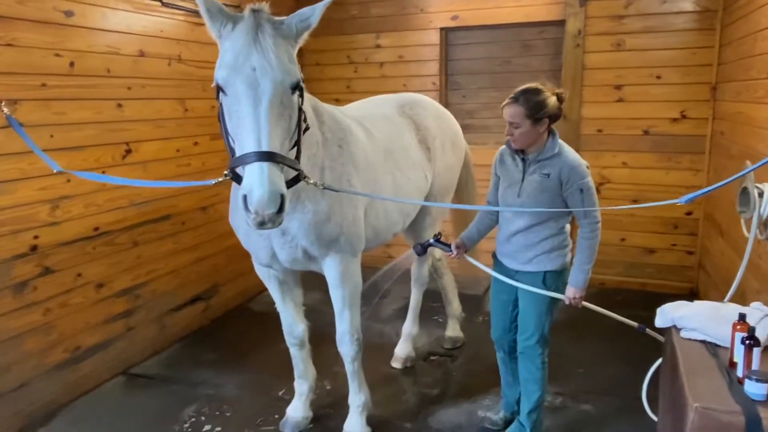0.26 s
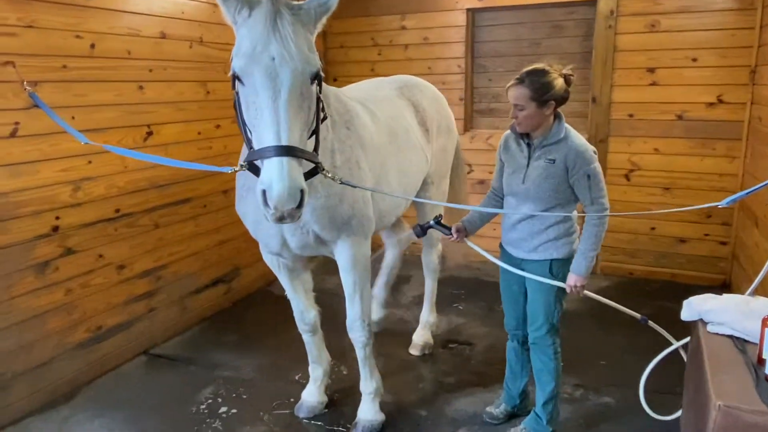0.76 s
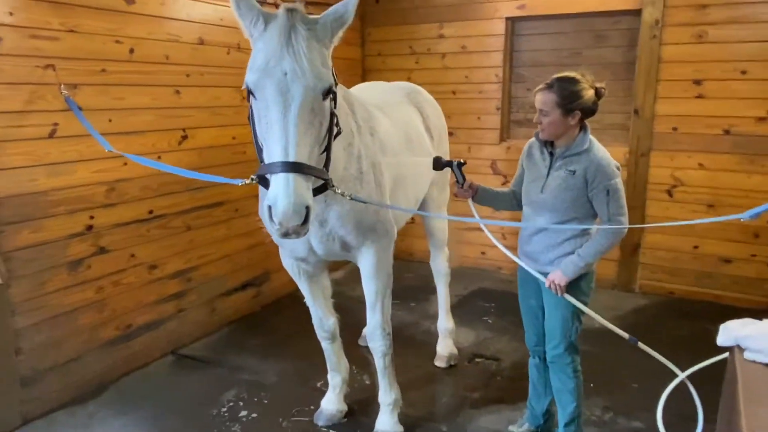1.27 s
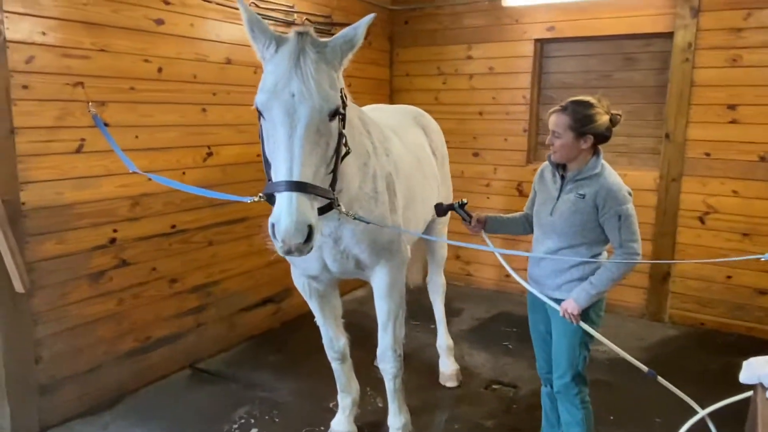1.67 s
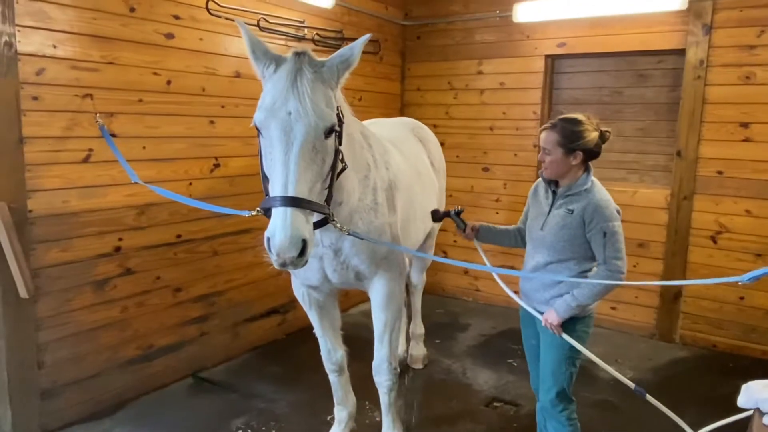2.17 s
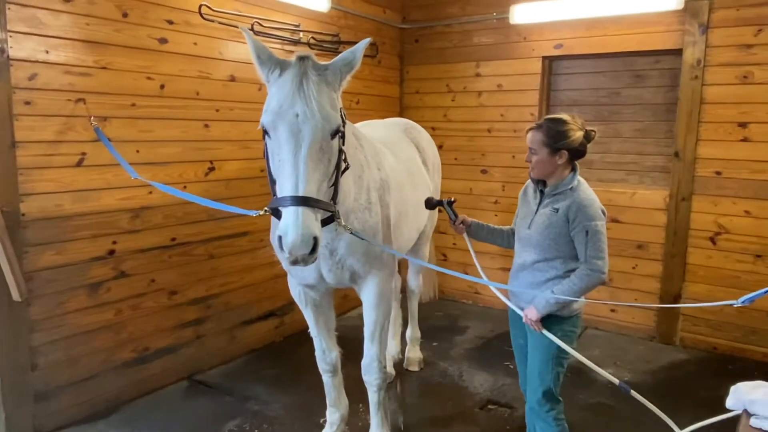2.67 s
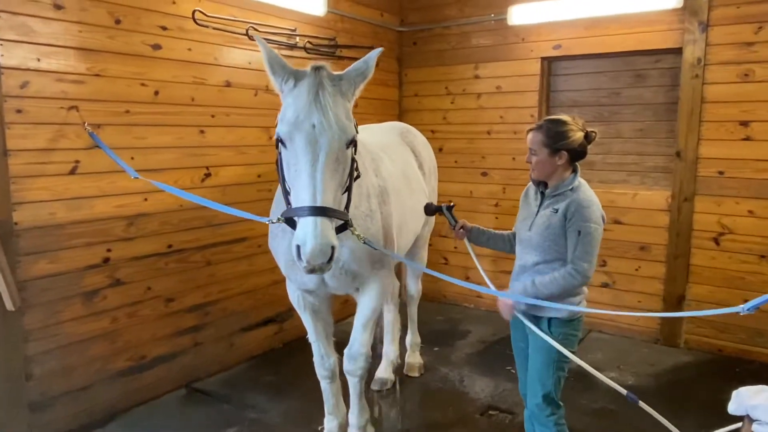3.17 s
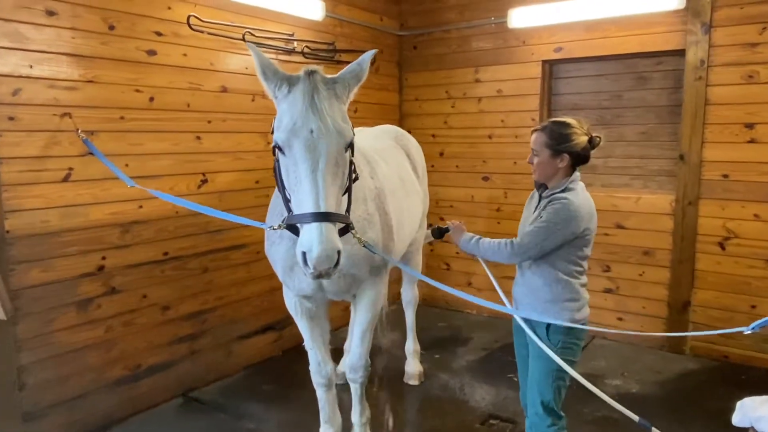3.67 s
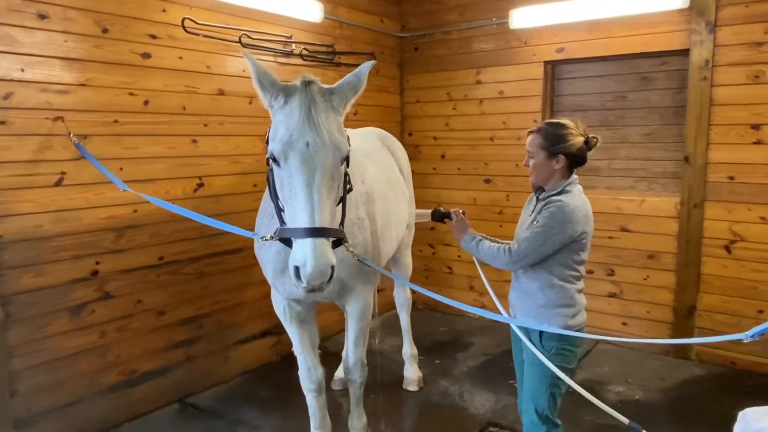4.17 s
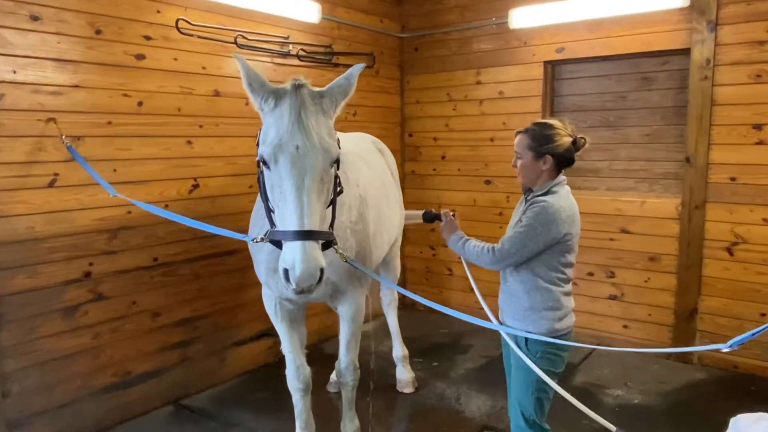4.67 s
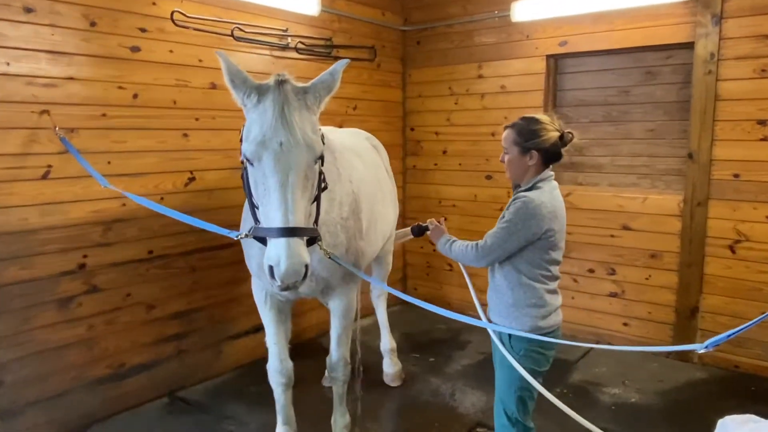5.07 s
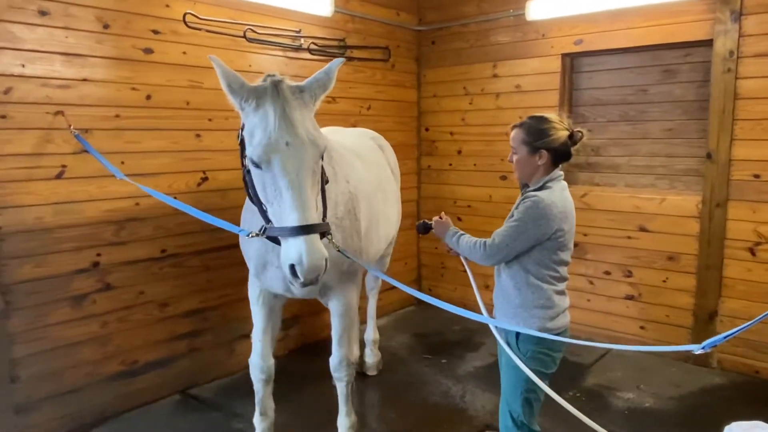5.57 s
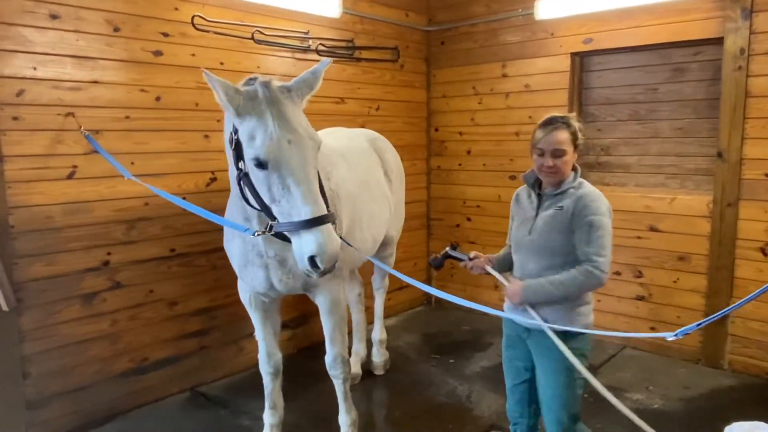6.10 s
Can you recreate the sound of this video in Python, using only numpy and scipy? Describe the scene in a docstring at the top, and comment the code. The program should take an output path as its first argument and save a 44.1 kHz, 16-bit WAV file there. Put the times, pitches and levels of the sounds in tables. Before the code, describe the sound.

A small boarded wash stall with short echoes and soft low rumble, heard in stereo from fairly near. From 0 to 1.3 s the hose spray is weak, a thin hiss with a slight splatter swell around 0.6 s, a tiny hollow gulp at 0.5 s and a dull knock at about 0.87 s. Around 1.4 s the jet strengthens on the horse's coat; by 2.1 s it is a bright, uneven hiss with splatter and light drumming. From 2 to 5.5 s run-off smacks the wet floor in irregular clusters of sharp, bubbly plops and ticks, prominent near 2.4, 3.25, 3.45, 3.7 and 4.05 s. The spray briefly thins around 4.4 s and swells again about 5 s. Small knocks come near 3.5, 3.83 and 4.93 s. After 5.5 s the spray drops sharply to a faint hiss, with a distinct drop at 5.97 s and soft bumps and clunks from 5.8 to 6.3 s.

```python
"""A hose nozzle sprays a horse's legs and coat in a boarded wash stall: droplet impacts, filtered into bands,
give hiss, splatter and drumming, and the same bands carry the barn rumble and the murmur of water.
Run-off smacks the wet rubber floor as ringing bubbles with a crack and a tick. Thumps and knocks, some perhaps
hooves or boots, some short thumps at the microphone, are filtered noise with damped low modes; tones gulp.
Walls add echoes and a tail. Two microphone ports hear it, alike in the bass, with a phase lag in the treble."""
import sys
import numpy as np
from scipy import signal
from scipy.fft import rfft, irfft, next_fast_len
from scipy.io import wavfile

SR = 44100
rng = np.random.default_rng(int(sys.argv[2]) if len(sys.argv) > 2 else 0)


def store_wav(level_fs):
    """Save 16-bit WAV to argv[1]."""
    pcm = np.round(np.clip(np.atleast_2d(level_fs), -1, 1) * 32767)
    wavfile.write(sys.argv[1], SR, pcm.T.astype(np.int16))


N = 279594   # length in samples

# sweeping jet: t/s, splatter level/dB, mist level/dB, low drumming level/dB
JET_LEVELS = [(0.0, -57, -58.5, -94), (0.32, -55.5, -54.5, -55), (0.6, -45, -51, -49),
              (0.83, -54, -55.5, -53), (1.13, -63, -53.5, -61), (1.27, -59, -47, -53),
              (1.38, -45, -47.5, -53), (1.58, -39.5, -42, -41.5), (1.98, -47, -48.5, -45.5),
              (2.14, -35, -38, -37.5), (2.24, -42.5, -41, -42), (2.5, -40, -59, -44), (2.63, -41, -45, -39),
              (2.77, -43.5, -41.5, -38), (2.88, -59, -34.5, -39), (2.97, -56, -44.5, -42.5),
              (3.06, -46.5, -40, -43.5), (3.32, -40, -38, -40.5), (3.73, -43, -42.5, -42),
              (3.92, -40.5, -41.5, -40), (4.18, -46.5, -44, -46.5), (4.41, -49.5, -45.5, -50),
              (4.64, -43, -49.5, -47.5), (4.96, -39.5, -43, -44.5), (5.12, -42.5, -37.5, -44),
              (5.33, -45, -38.5, -44), (5.61, -64, -59.5, -56), (5.8, -66, -57.5, -69),
              (6.02, -63, -48.5, -55), (6.09, -59, -43.5, -48), (6.2, -55, -63, -55.5),
              (6.34, -62.5, -56, -56)]
# spectra of the jet's parts: f/Hz, level per Hz/dB
DRUMMING_SPECTRUM = [(300, -13.5), (600, -13), (850, -6), (1100, -1.5), (1400, -3), (2200, -10)]
SPLATTER_SPECTRUM = [(900, -31), (1300, -7), (1600, -3.5), (2000, 0), (2600, -3), (3100, -9), (3700, -6),
                     (5500, -22)]
MIST_SPECTRUM = [(2200, -9), (3500, -6), (4500, -2), (5500, -9.5), (7000, -5.5), (10000, -34)]
NOZZLE_SPECTRUM = [(5000, 2), (8000, -3.5), (10000, 1.5), (12500, -1.5), (15000, -12.5), (17000, 13)]
# hiss at the nozzle: t/s, level/dB
NOZZLE_LEVEL = [(0.0, -53), (0.14, -64.5), (0.55, -51), (0.97, -60.5), (1.45, -44.5), (1.94, -51),
                (2.03, -43), (2.21, -46), (3.16, -43), (3.21, -42.5), (3.67, -42), (3.69, -40), (3.73, -43),
                (4.33, -53.5), (4.34, -47), (4.7, -48.5), (5.17, -40), (5.77, -61.5), (6.11, -60),
                (6.34, -69)]
# barn rumble: t/s, level/dB
RUMBLE_LEVEL = [(0.0, -52.5), (0.44, -49.5), (3.37, -54.5), (3.81, -47), (4.45, -53), (5.4, -46),
                (5.72, -53), (6.34, -50.5)]
# barn rumble: f/Hz, level per Hz/dB
RUMBLE_SPECTRUM = [(15, -37), (25, -21), (48, -2), (70, 0), (120, -4.5), (160, -9), (230, -23), (300, -42)]
# murmur of water on the floor: t/s, level/dB
MURMUR_LEVEL = [(0.0, -58.5), (0.63, -54), (0.94, -56), (1.36, -60), (1.77, -56), (2.59, -60), (2.77, -52),
                (3.02, -59.5), (3.28, -60.5), (3.78, -54), (4.5, -56.5), (5.19, -54.5), (5.4, -55),
                (5.63, -56.5), (5.81, -66.5), (6.34, -56)]
# murmur of water: f/Hz, level per Hz/dB
MURMUR_SPECTRUM = [(150, -16), (200, 6), (260, -1.5), (420, -1.5), (600, -4.5), (800, -4.5), (1040, -30)]
# jet's core against the splatter: t/s, relative level/dB
CORE_LEVEL = [(0, -20), (1.4, -10), (1.7, -11), (2.0, -10), (2.6, -12), (3.4, -15), (4.2, -8), (4.7, -8),
              (5.0, -17), (5.5, -5), (6.34, -14)]
# run-off dripping from the coat: t/s, mean rate of small drops/(1/s)
RUN_OFF_RATE = [(0, 4.7), (1.7, 13.7), (2.0, 113), (3.0, 51), (4.2, 64), (5.4, 74), (5.8, 25), (6.34, 7.6)]
# loud drops on the wet floor: t/s, level/dB, bubble f/Hz, crack and tick each re bubble/dB, ring decay/cycles
LOUD_DROPS = [(0.8862, -31, 7600, -3, 10, 1.6), (1.8713, -29.5, 4370, -9, -18.0, 1.6),
              (1.9196, -27, 4530, 2, -11.0, 3.5), (1.9992, -29, 7080.0, 2, -3, 3.5),
              (2.006, -24, 7040, 3, 8, 3.3), (2.027, -28, 3300, 2, -24, 1.3),
              (2.0294, -14.5, 2830, 2, 3, 0.49), (2.0434, -15.5, 2660, -12, -6, 0.4),
              (2.0527, -28, 3000.0, -5.0, -20.0, 1.2), (2.058, -18, 7500, -15, -10, 1.5),
              (2.0762, -22, 2620, -4, 11, 0.76), (2.1065, -15, 3940, -3, -28, 1.4),
              (2.109, -15, 2400, 2, -3, 2.8), (2.126, -14, 4620, -8, -14, 1),
              (2.2522, -11, 3200, -7, -18, 0.47), (2.386, -20.5, 4500, -13, -25.0, 1.5),
              (2.408, -9.5, 2600, -6, -31, 0.91), (2.4612, -17.5, 2750, -8, -30.0, 1.7),
              (2.466, -24, 2540, -12, -25.0, 1.8), (2.694, -28.5, 2660.0, 8, -20.0, 0.71),
              (2.7166, -25.5, 3800, 1, 6, 1.4), (2.7943, -15.5, 3700, 1, 0, 0.9),
              (2.8, -30, 3880.0, -1.0, -12.0, 3.1), (2.8073, -20, 7500, -11, -9.0, 3.5),
              (2.856, -30, 4150.0, -7, -13.0, 1.3), (2.8662, -16, 5030, -14, 2, 0.38),
              (3.1007, -20.5, 5300, -14, -17, 3), (3.1384, -23.5, 2710, -4, -30.0, 1.6),
              (3.187, -22.5, 6600, -3, -17, 3.1), (3.2076, -13.5, 2690.0, -25.0, -35, 0.97),
              (3.216, -13, 4400, -8, -7, 0.8), (3.2377, -12.5, 6700, -9, 7, 0.99),
              (3.248, -10, 2480, -3.5, -20.0, 0.75), (3.2575, -16.5, 6200, 3, -9.0, 2),
              (3.395, -14, 2440, -20, -20.0, 2.8), (3.414, -10, 4140, -13, -13, 1.1),
              (3.417, -27.5, 2330, 10, -11, 1.5), (3.42, -19, 4380, 1, -18, 4.2),
              (3.436, -19.5, 3080, -27, 11.5, 2.9), (3.4508, -9.5, 2690, -16, -22, 2.3),
              (3.6209, -22.5, 2780, -20, 3, 3), (3.6839, -14.5, 3930, -19, 11.5, 0.89),
              (3.688, -35, 4500, 4, -2, 1.8), (3.6947, -20, 4000.0, -10, -6.0, 1.0),
              (3.6976, -7.5, 2290, -1.5, -8, 1.9), (3.7348, -9.5, 2630.0, -29, -21.0, 3.1),
              (3.7425, -16, 3070, -23, -25.0, 4.7), (3.825, -25, 3430, -16, 11, 3.3),
              (3.8414, -19, 2050, -2, -22, 0.63), (3.9364, -22.5, 2470, -2, 5, 4.1),
              (3.945, -10, 2630.0, -10.5, -24.0, 1.5), (3.963, -17.5, 3670, -7, 1, 1.5),
              (4.0125, -25, 4320.0, -8, -17.0, 1.4), (4.0543, -6.5, 2670, -2, -8, 0.95),
              (4.073, -25, 2590, -11.0, -16.0, 2.3), (4.3459, -26, 4200, -12, 9, 1.7),
              (4.381, -24, 6300, -3, 5, 1.1), (4.4269, -20.5, 3550, -3, -4, 1),
              (4.5948, -16, 6400, -12, 2, 0.73), (4.7002, -15.5, 4730, -3, -12, 0.7),
              (4.8064, -22.5, 2450.0, -1, -16, 1.2), (4.908, -28, 3810, -8, -20, 1.2),
              (4.914, -16.5, 3620.0, -13, -19.0, 1.6), (4.936, -21, 2170, 2, -26, 0.47),
              (4.9502, -13, 2900, -8, -24, 1.2), (4.9637, -27, 3040, -1, -20, 2),
              (4.977, -16.5, 3640.0, -12, -16.0, 2), (5.0181, -23, 2650, 8.5, -30.0, 3.5),
              (5.042, -28, 7000, -8, 13, 1.5), (5.053, -25, 7800, -3, 17, 1.5),
              (5.0631, -13.5, 2490, -6.5, -18.0, 1.8), (5.127, -22, 3490.0, 1, 9, 2.1),
              (5.1641, -23, 5400, -16, -21, 4.1), (5.238, -34, 3660, 10, -13, 1.7),
              (5.2696, -19.5, 3980, -1.5, -30.0, 0.7), (5.3223, -22.5, 3800, -3, 1, 1.9),
              (5.3772, -18, 7770.0, -7, -5.0, 2.3), (5.3845, -20.5, 3170, 3.5, -10, 0.63),
              (5.3972, -14, 2690, -14, -2, 1), (5.4216, -23.5, 2500, 9.5, -30.0, 1.4),
              (5.501, -19.5, 4260, -6.5, -7, 0.61), (5.553, -45, 7240.0, -29, 0.0, 3.5),
              (5.5627, -33, 5100.0, -7, -5, 3.5), (5.605, -37, 3840, -15, 15, 1.6),
              (5.6406, -35.5, 5840, -3, -15, 4.6), (5.91, -28.5, 4540, 3, -3, 0.33),
              (5.9683, -16.5, 4700, -2.5, -16, 1.6)]
# hollow gulps, as of water sucked from under a sole: t/s, level/dB, start f/Hz, glide/(octaves/s), length/s
SOLE_GULPS = [(0.489, -40, 321.3, -9.5, 0.05), (2.61, -36, 336, -2, 0.027), (2.631, -38, 290.4, 11, 0.06)]
# thumps and knocks, some perhaps hooves or boots, some short thumps at the microphone:
# t/s, knock level/dB, knock f/Hz, boom drive/dB, extra drive above 100 Hz/dB, knock decay/s
THUMPS = [(0.869, -32, 573, -45, -10, 0.02), (0.871, -51, 810, -60, 2, 0.018),
          (0.877, -41.5, 335, -30.5, -0.5, 0.032), (0.905, -50, 660, -57, 3, 0.034),
          (0.94, -45, 730, -63, 0, 0.0099), (0.981, -58, 605, -43, -17, 0.02),
          (1.006, -48.5, 690, -53, 4, 0.018), (1.09, -60, 493, -52, -21, 0.034),
          (2.019, -38, 497, -39.5, 4, 0.012), (3.478, -46, 472, -64, -9, 0.036),
          (3.555, -40.5, 407, -55, 1, 0.029), (3.573, -42.5, 306, -35.5, -25, 0.012),
          (3.646, -50.5, 302, -41, -10, 0.038), (3.834, -30, 1220, -52, 6, 0.0034),
          (3.84, -34, 1220, -65, 0, 0.024), (3.848, -36, 2210, -58, 0, 0.02),
          (3.837, -38.5, 382, -43, -6, 0.028), (4.189, -50, 533, -56, -4, 0.044),
          (4.934, -31, 540, -60, 8, 0.0023), (4.935, -39.5, 258, -60, 8, 0.0035),
          (4.991, -62, 330, -62, 4, 0.0053), (5.145, -55, 249, -43.5, 13.5, 0.021),
          (5.176, -40.5, 315, -43, 9, 0.016), (5.816, -52, 850, -52, 2, 0.034),
          (5.818, -53, 300, -39, 2.5, 0.037), (5.837, -50.5, 840, -47, 1, 0.043),
          (5.873, -47, 290, -51, 11, 0.017), (6.032, -61, 1200, -60, 0, 0.02),
          (6.045, -48.5, 1750, -38, 6, 0.018), (6.062, -39.5, 1130, -48, 3, 0.008),
          (6.066, -45.5, 610, -60, 1, 0.015), (6.076, -45, 251, -36, 9, 0.047),
          (6.104, -47, 780, -39, 8.5, 0.013), (6.169, -50, 292, -59, 4, 0.027),
          (6.219, -53, 392, -55, 13, 0.023), (6.265, -62, 297, -55, 4, .03)]
# low modes of the boom: f/Hz, relative level/dB, t60/s
BOOM_MODES = [(59, -2, 0.12), (68.8, 6, 0.19), (74.4, 3, 0.17), (119.4, -4, 0.097), (123, 3, 0.085),
              (154, -6, 0.12), (247, -13, 0.085)]
# coherence of the two ports: f/Hz, share of power heard by both
SHARED_POWER = [(60, 0.89), (200, 0.72), (400, 0.48), (550, 0.1), (1000, 0.55), (1400, 0.029), (2200, 0.24),
                (3500, 0.23), (6000, 0.023), (8000, 1), (16000, 1)]
# phase between the ports: f/Hz, lead of the left/rad
LEFT_LEAD = [(0, 0), (1600, 0), (3700, 1.5), (4900, .3), (5300, -1), (6200, .2), (7000, 0), (9000, -np.pi),
             (11100, -2 * np.pi), (13300, -3 * np.pi), (15300, -4 * np.pi), (17000, -15)]
# decay of the stall: f/Hz, t60/s
STALL_DECAY = [(100, 0.7), (500, 0.95), (2500, 0.3), (8000, 0.55), (16000, 0.013)]
# early reflections: delay/s, level/dB
EARLY_ECHOES = [(.0065, -12.5), (0.016, -14)]

CORE_HZ, CORE_HALF_WIDTH_HZ, CORE_WAVER_DB = 1970, 175, 3
BUBBLES_PER_S, BUBBLES_DB, BUBBLE_CYCLES = 260, -6.5, 31   # level re drumming; cycles to fall 60 dB
NARROW_HISS_DB, JET_LIFTS_S, LIFT_FADE_S = -59.5, 0.99, 0.37   # while the jet points at the floor
SPLASH_MIST_DB, SPLASH_HISS_DB, SPLASH_DECAY_S = -25.5, -41, 0.041   # levels re the loud drop
DROP_SAMPLES, LEAD = 400, 100   # length of a drop, and its part before the peak
SWELL_CYCLES, CRACK_DECAY_S, TICK_DECAY_S = 1.22, 0.00086, 0.00092
SPATTER_DB = -8.5   # rough tails of crack and tick
CRACK_HZ = (1800, 7500)   # the tick lies above the upper edge
DROP_CUT_HZ = 1510   # a drop is too small to sound lower
GULP_EDGE_S, GULP_WOBBLE_OCT, GULP_FLUTTER_DB = 0.013, .1, 2.5
RISE_SHARE, KNOCK_WIDTH_OCT = 0.19, 1.1   # rise time per decay time; width of the noise
KNOCK_RING_DB, KNOCK_RING_CYCLES = 6, 2.0   # a ring at the first touch
SIDE_WALL_S, SIDE_WALL_DB, SIDE_WALL_HZ = .0119, [[-5.5], [1]], (3200, 7000)   # dB for left, right
CUTOFF_HZ = 15700


def amp(db):
    """Logarithmic level: amplitude grows tenfold every 20 dB."""
    return 10 ** (np.asarray(db) / 20)


def rms_one(x):
    """Normalization of mean power: the signal is scaled to rms 1."""
    return x / np.sqrt(np.mean(x ** 2) + 1e-20)


def filtered(x, order, hz, kind):
    """Linear filtering: a Butterworth response passes the chosen part of the spectrum."""
    return signal.sosfilt(signal.butter(order, hz, kind, fs=SR, output="sos"), x)


def in_time(rows):
    """Linear interpolation: each column of a time table becomes a sampled curve."""
    s, *columns = np.transpose(rows)
    return [np.interp(np.arange(N) / SR, s, c) for c in columns]


def at_hz(points, hz):
    """Interpolation of a spectrum on a logarithmic frequency axis."""
    frequencies, values = np.array(points).T
    return np.interp(np.log(hz), np.log(frequencies), values)


def drift(rate):
    """Low-passed randomness: a curve of spread 1 that changes about rate times a second."""
    r = np.exp(-80 * np.pi * rate / SR)   # computed at every 40th sample
    noise = rng.standard_normal(N // 40 + 2002)
    slow = signal.lfilter([1], [1, -2 * r, r * r], noise)[2000:]   # settled part only
    return np.interp(np.arange(N) / 40, np.arange(len(slow)), rms_one(slow))


def bands(x, low_hz):
    """Third-octave analysis: neighbouring bands take turns on two independent noises."""
    edges = low_hz * 2 ** (np.arange(0, 29) / 3)
    for k, (low, high) in enumerate(zip(edges, edges[1:])):
        yield np.sqrt(low * high), filtered(x[k % 2], 2, [low, high], "band")


def ports(common, own=None):
    """Partial coherence: left and right share a phase-shifted sound, mixed with what each hears alone."""
    size = next_fast_len(N)
    hz = np.arange(size // 2 + 1) * SR / size
    half_turn = np.exp(.5j * np.interp(hz, *np.transpose(LEFT_LEAD)))
    both = rfft(common, size) * np.array([half_turn, half_turn.conj()])
    if own is not None:
        share = np.clip(at_hz(SHARED_POWER, hz + 1), 0, 1)
        both = np.sqrt(share) * both + np.sqrt(1 - share) * rfft(own, size)
    return irfft(both, size)[:, :N]


def droplets(per_s, spread_db, shape):
    """Shot noise: random impacts of uneven size and either sign, scaled to rms 1."""
    sizes = amp(spread_db * np.minimum(rng.exponential(1, shape), 6))
    signed = sizes * rng.choice([-1, 1], shape)
    return rms_one(signed * (rng.random(shape) < per_s / SR))


def spray_and_rumble(patchy_db=0.98, flicker_db=1.61, sputter_db=0.46):
    """Additive power spectra: droplet noise is weighted by band, swelling partly together, partly alone."""
    splatter, mist, drumming = in_time(JET_LEVELS)
    levels = [drumming, splatter, mist]
    levels += in_time(NOZZLE_LEVEL) + in_time(RUMBLE_LEVEL) + in_time(MURMUR_LEVEL)
    spectra = [DRUMMING_SPECTRUM, SPLATTER_SPECTRUM, MIST_SPECTRUM,
               NOZZLE_SPECTRUM, RUMBLE_SPECTRUM, MURMUR_SPECTRUM]
    widths_hz = [700, 1300, 2000, 3000, 100, 300]   # each power is spread over this width
    power = [amp(2 * level) / width * SR / 2 for level, width in zip(levels, widths_hz)]
    splash = splashes() * SR / 2
    power[2] = power[2] + amp(2 * SPLASH_MIST_DB) * splash / widths_hz[2]
    power[3] = power[3] + amp(2 * SPLASH_HISS_DB) * splash / widths_hz[3]
    together = patchy_db * drift(3.1) + flicker_db * drift(10.2) + sputter_db * drift(135)
    out = 0
    for hz, band in bands(droplets(9000, 1.36, (2, 3, N)), 27.28):
        mix = 0
        for p, spectrum in zip(power, spectra):
            if spectrum[0][0] < hz < spectrum[-1][0]:
                mix = mix + p * amp(2 * at_hz(spectrum, hz))
        # the shared swelling is weaker in the bass
        swelling_db = together * np.clip(hz / 3000, .2, 1) + flicker_db * drift(18.8)
        out = out + np.sqrt(mix) * amp(swelling_db) * band
    return ports(out[0], out[1:])


def jet_core():
    """Band-limited shot noise: a focused, wavering band of the splatter where the jet lands hardest."""
    edges = [CORE_HZ - CORE_HALF_WIDTH_HZ, CORE_HZ + CORE_HALF_WIDTH_HZ]
    noise = rms_one(filtered(droplets(4000, 2.5, (3, N)), 2, edges, "band"))
    level_db = in_time(JET_LEVELS)[0] + in_time(CORE_LEVEL)[0] + CORE_WAVER_DB * drift(6.3)
    noise = noise * amp(level_db)
    return ports(noise[0], noise[1:])


def film_bubbles():
    """Damped resonance: bursts in the water film on the coat ring briefly at one of 16 pitches."""
    bursts = droplets(BUBBLES_PER_S, 4.0, (3, N))
    dealt, out = rng.integers(0, 16, (3, N)), 0
    for k, hz in enumerate(np.geomspace(850, 2900, num=16)):
        r, w = amp(-60 * hz / (BUBBLE_CYCLES * SR)), 2 * np.pi * hz / SR
        struck = bursts * (dealt == k) + 1e-18
        out = out + signal.lfilter([0, np.sin(w)], [1, -2 * r * np.cos(w), r * r], struck)
    out = rms_one(out) * amp(in_time(JET_LEVELS)[2] + BUBBLES_DB)   # follows the drumming
    return ports(out[0], out[1:])


def narrow_hiss(hz=1120.0, half_width_hz=80.0, waver_db=2.5):
    """Narrow-band noise: one band wavers and fades out as the jet lifts."""
    edges = [hz - half_width_hz, hz + half_width_hz]
    noise = rms_one(filtered(rng.standard_normal((3, N)), 2, edges, "band"))
    fade = np.clip(1 - (np.arange(N) / SR - JET_LIFTS_S) / LIFT_FADE_S, 0, 1)
    noise = noise * amp(NARROW_HISS_DB + waver_db * drift(9.8)) * fade
    return ports(noise[0], noise[1:])


def drop(hz, crack_db, tick_db, cycles, rise=0.003):
    """Bubble resonance: trapped air swells and rings with rising pitch; a crack and a tick mark its peak."""
    t = (np.arange(DROP_SAMPLES) - LEAD) / SR
    turns = hz * t
    attack = (np.minimum(turns, 0) / SWELL_CYCLES) ** 2
    decay = np.maximum(turns, 0) / max(cycles, .4)
    bubble = np.sin(2 * np.pi * turns * (1 + rise * turns / 2)) * np.exp(-attack - decay)
    slap = t == 0
    spatter = amp(SPATTER_DB) * rng.standard_normal(DROP_SAMPLES) * (t > 0)
    # zero-phase filters keep crack and tick centred on the slap
    crack_band = signal.butter(2, CRACK_HZ, "band", fs=SR, output="sos")
    tick_band = signal.butter(2, CRACK_HZ[1], "high", fs=SR, output="sos")
    crack = signal.sosfiltfilt(crack_band, slap + spatter * np.exp(-np.abs(t) / CRACK_DECAY_S))
    tick = signal.sosfiltfilt(tick_band, slap + spatter * np.exp(-np.abs(t) / TICK_DECAY_S))
    crack = amp(crack_db) * crack / np.abs(crack).max()
    return bubble + crack + amp(tick_db) * tick / np.abs(tick).max()


def drops(small_db=5.0):
    """Random arrivals: small drops fall at the run-off rate, their level following the mist, among loud ones."""
    out = np.zeros(N + DROP_SAMPLES)
    for s, db, hz, crack_db, tick_db, cycles in LOUD_DROPS:
        i = round(s * SR) - LEAD
        out[i:i + DROP_SAMPLES] += amp(db) * drop(hz, crack_db, tick_db, cycles)
    mist_db = in_time(JET_LEVELS)[1]
    fallen = np.cumsum(in_time(RUN_OFF_RATE)[0]) / SR   # expected count so far
    gaps, pitches, sizes = rng.random((600, 3)).T
    starts = np.searchsorted(fallen, np.cumsum(-np.log(gaps)))
    for i, pitch, size in zip(starts, pitches, sizes):
        if i < N:
            level_db = mist_db[i - 1] + small_db - 3.0 * np.log(size + 0.079)
            out[i:i + DROP_SAMPLES] += amp(level_db) * drop(2200 * 3.5 ** pitch, -19, 7.0, 1.7)
    return filtered(out[:N], 3, DROP_CUT_HZ, "high")


def gulps():
    """Cavity resonance: a rough, unsteady tone glides as its cavity changes size."""
    out, t = 0, np.arange(N) / SR
    for s, db, hz, glide, length in SOLE_GULPS:
        age = np.clip(t - s, 0, length)
        edges = np.clip(np.minimum(age, length - age) / GULP_EDGE_S, 0, 1)
        level = amp(db + GULP_FLUTTER_DB * drift(90)) * edges
        pitch_hz = hz * 2 ** (glide * age + GULP_WOBBLE_OCT * drift(60.5))
        out = out + level * np.sin(2 * np.pi * np.cumsum(pitch_hz) / SR)
    return out


def thumps():
    """Modal excitation: a short knock of band noise with a ring, then a boom of damped low modes."""
    out, t = np.zeros(N + SR), np.arange(SR // 2) / SR
    late = np.maximum(t - .008, 0)   # the boom builds up after the first touch
    for s, knock_db, hz, boom_db, upper_db, decay in THUMPS:
        rise = RISE_SHARE * decay
        envelope = np.exp(-np.maximum(t - rise, 0) / decay) * np.minimum(t / rise, 1)
        edges = hz * 2 ** (KNOCK_WIDTH_OCT * np.array([-.5, .5]))
        rough = filtered(rng.standard_normal(len(t)) * envelope, 3, edges, "band")
        age = hz * t / KNOCK_RING_CYCLES
        ring = np.sin(2 * np.pi * hz * t) * age * np.exp(-age)
        knock = rough / np.abs(rough).max() + amp(KNOCK_RING_DB) * ring
        knock = knock / np.sqrt(np.sum(knock ** 2) / (decay * SR))   # energy of rms 1 over the decay time
        boom = 0
        for f, mode_db, t60 in BOOM_MODES:
            strength = amp(mode_db + upper_db * (f > 100) + rng.standard_normal())
            boom = boom + strength * np.sin(2 * np.pi * f * late) * amp(-60 * late / t60)
        boom = boom * np.minimum(late / 0.01, 1)
        i = round(s * SR)
        out[i:i + len(t)] += amp(knock_db) * knock + amp(boom_db) * boom
    return out[:N]


def splashes():
    """Exponential decay: power jumps at each loud drop and dies away."""
    kicks, keep = np.zeros(N), np.exp(-1 / (SPLASH_DECAY_S * SR))
    for s, db, *_ in LOUD_DROPS:
        kicks[round(s * SR)] = amp(2 * db)
    return signal.lfilter([1], [1, -keep], kicks)


def delayed(x, s):
    """Travel time: the sound arrives s seconds later."""
    return np.r_[np.zeros(round(s * SR)), x][:N]


def stall(x):
    """Room reflection: three early wall echoes and a diffuse tail that dies band by band."""
    t = np.arange(SR // 2) / SR
    noise = rng.standard_normal((2, 3, len(t)))
    tail = sum(band * amp(-60 * t / at_hz(STALL_DECAY, hz)) for hz, band in bands(noise, 26.6))
    tail = tail * np.clip((t - .003) / .015, 0, 1)   # reflections thicken gradually
    tail = tail / np.sqrt(np.sum(tail[0] ** 2))
    wet = signal.fftconvolve(x[None], tail, axes=1)[:, :N]
    echoes = sum(amp(db) * delayed(x, s) for s, db in EARLY_ECHOES)
    side = filtered(delayed(x, SIDE_WALL_S), 2, SIDE_WALL_HZ, "band")
    side = amp(SIDE_WALL_DB) * [[1], [-1]] * side   # opposite phase at the two ports
    return ports(wet[0], wet[1:]), ports(echoes) + side


def scene():
    """Superposition: spray and rumble sound on; drops, thumps and gulps come direct, then from the walls."""
    drip, thump, gulp = drops(), thumps(), gulps()
    tail, echoes = stall(drip + amp(-4.5) * thump + amp(-8) * gulp)
    wet = amp(-5.0) * tail + echoes
    water = spray_and_rumble() + jet_core() + film_bubbles() + narrow_hiss()
    return water + ports(drip + thump + gulp) + wet


def record(dry):
    """Band limitation: the microphone loses the deep bass, and the top is cut steeply."""
    thin = filtered(dry, 2, 42, "high")
    return signal.sosfilt(signal.ellip(12, .5, 75, CUTOFF_HZ, fs=SR, output="sos"), thin)


dry = scene()
out = record(dry)
store_wav(out)
```